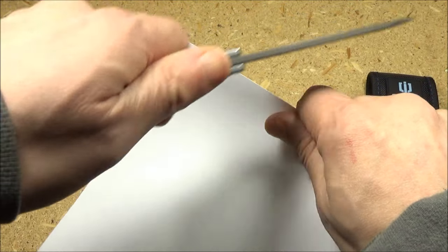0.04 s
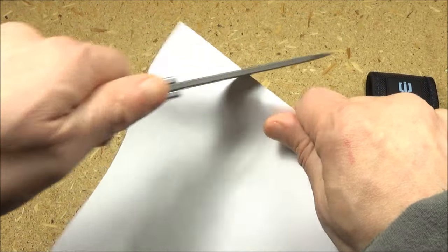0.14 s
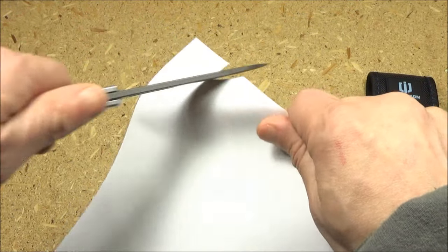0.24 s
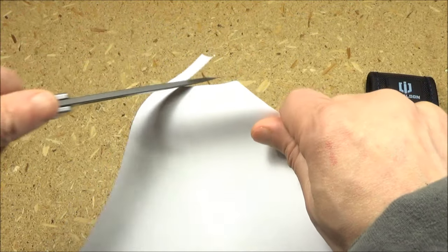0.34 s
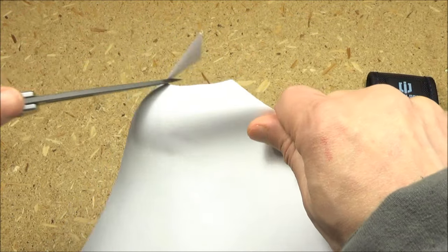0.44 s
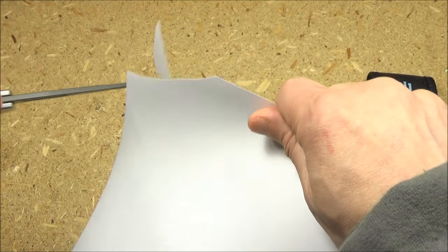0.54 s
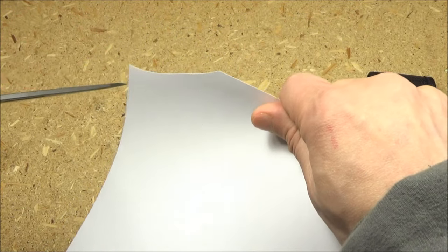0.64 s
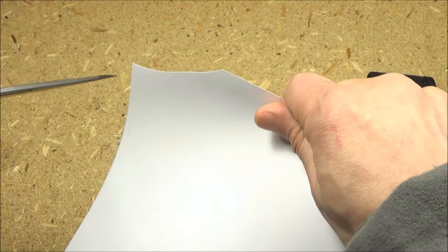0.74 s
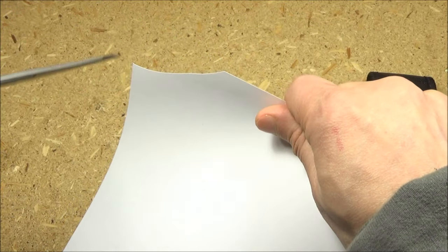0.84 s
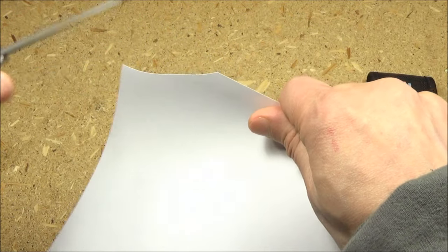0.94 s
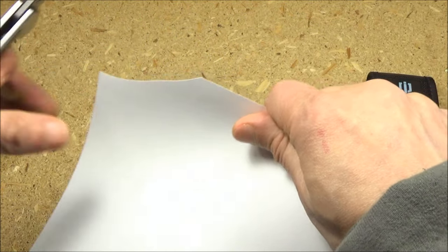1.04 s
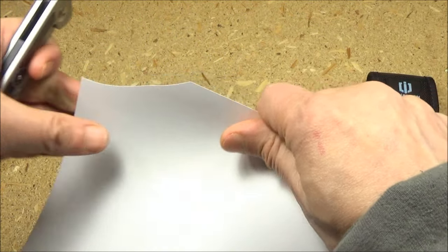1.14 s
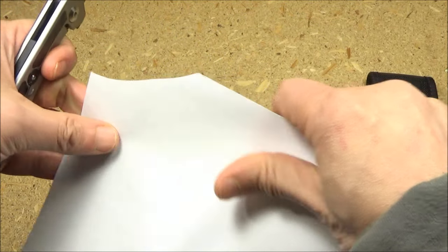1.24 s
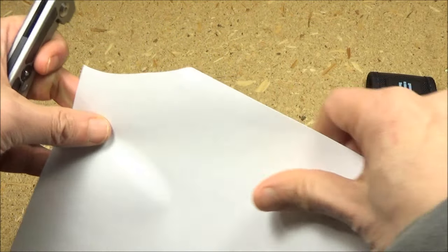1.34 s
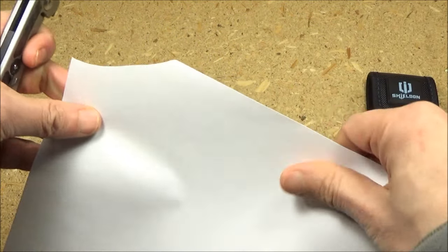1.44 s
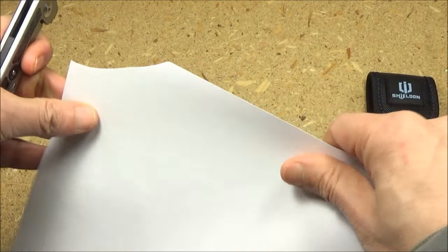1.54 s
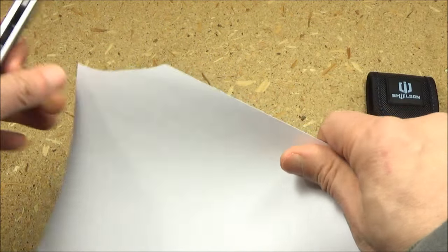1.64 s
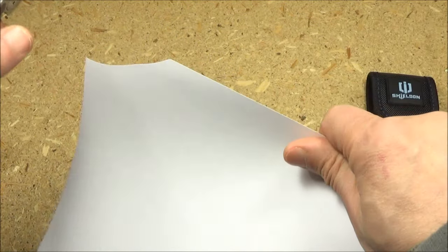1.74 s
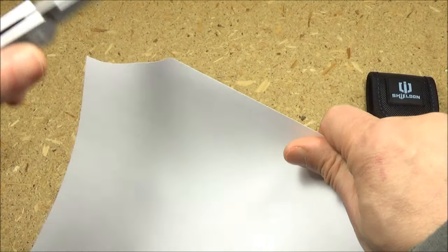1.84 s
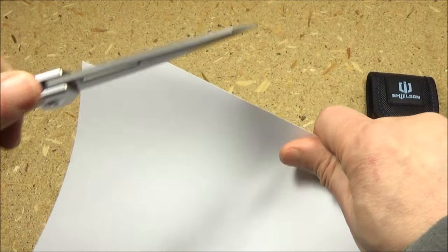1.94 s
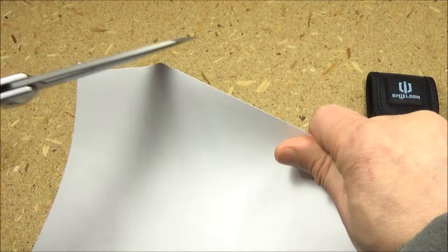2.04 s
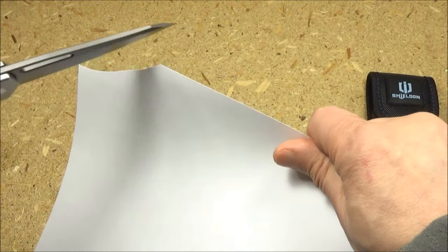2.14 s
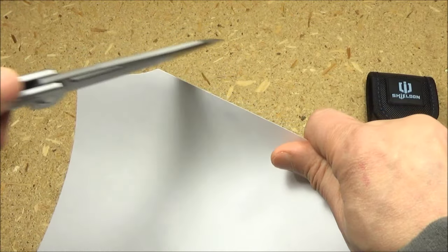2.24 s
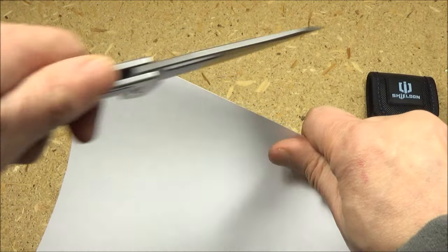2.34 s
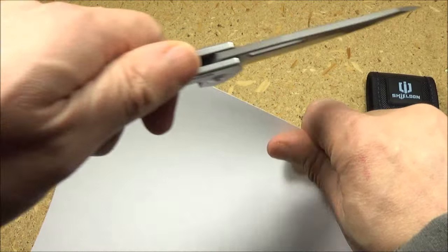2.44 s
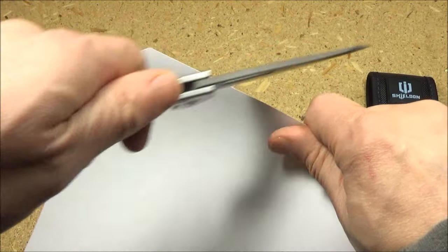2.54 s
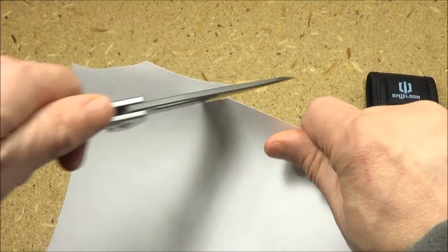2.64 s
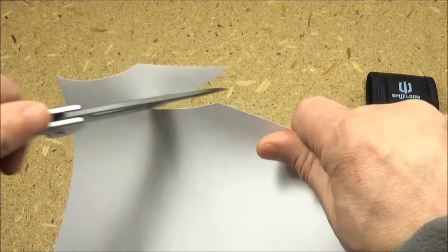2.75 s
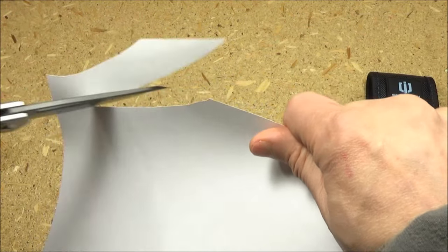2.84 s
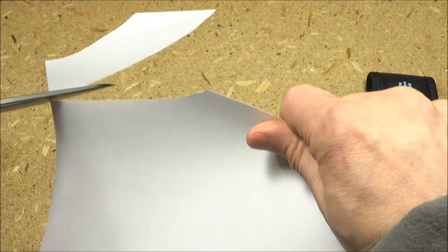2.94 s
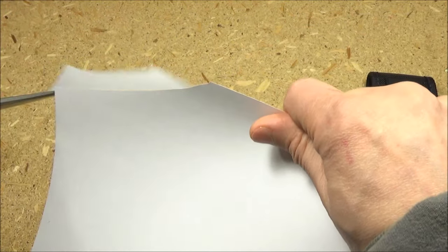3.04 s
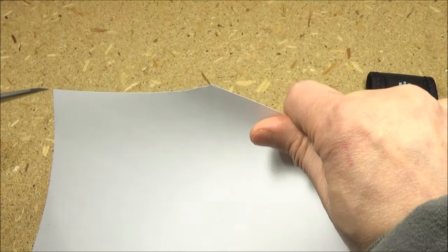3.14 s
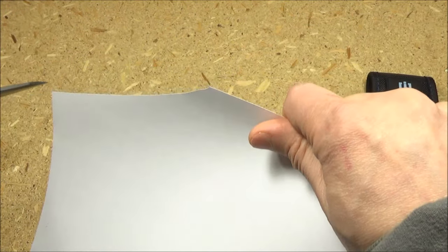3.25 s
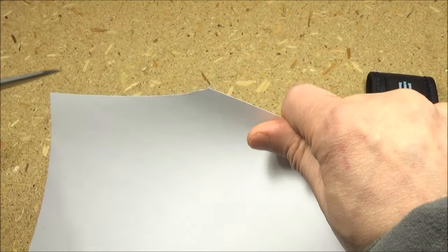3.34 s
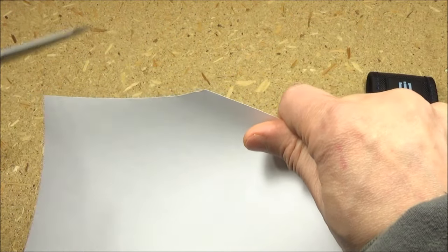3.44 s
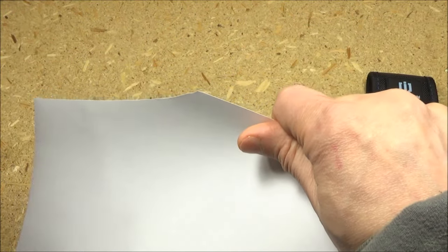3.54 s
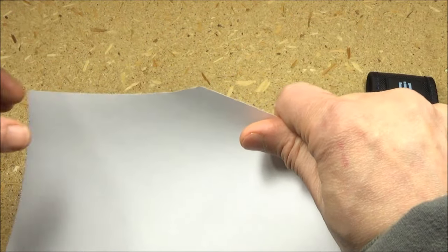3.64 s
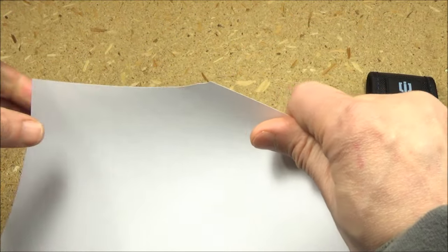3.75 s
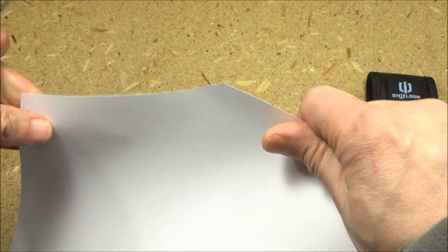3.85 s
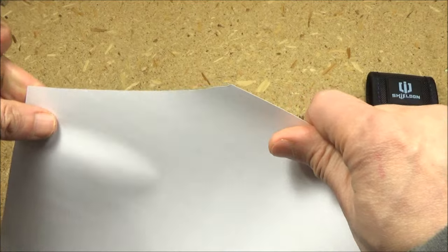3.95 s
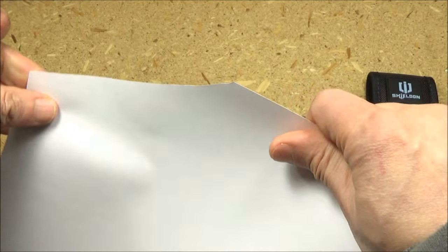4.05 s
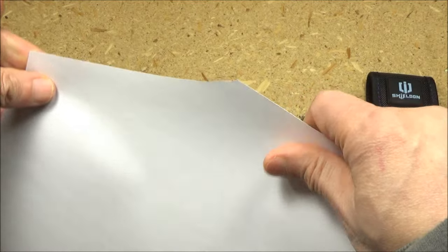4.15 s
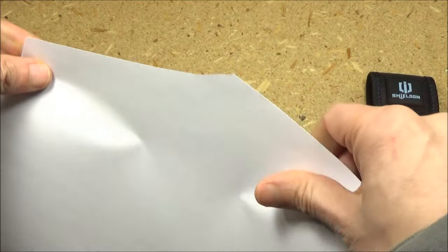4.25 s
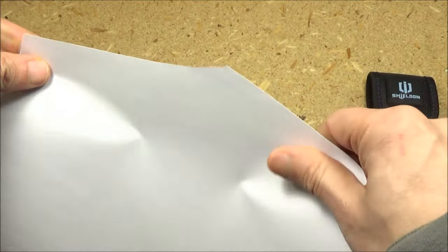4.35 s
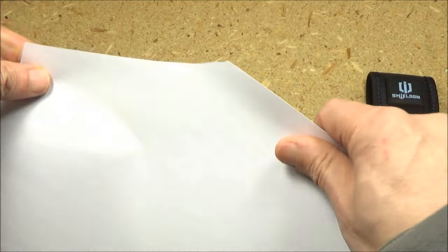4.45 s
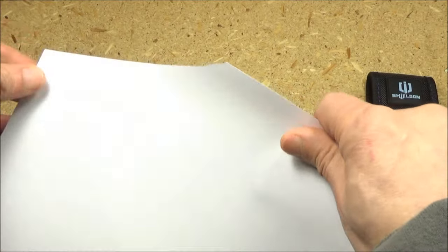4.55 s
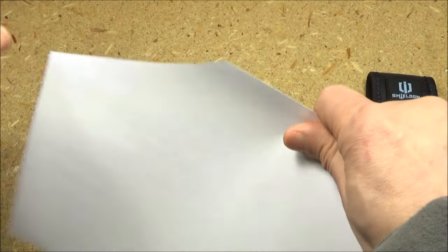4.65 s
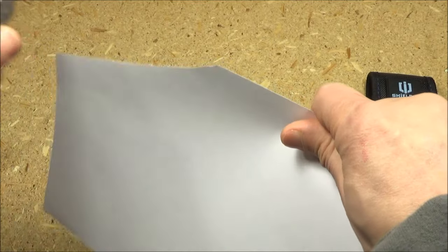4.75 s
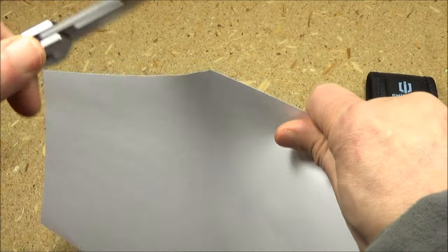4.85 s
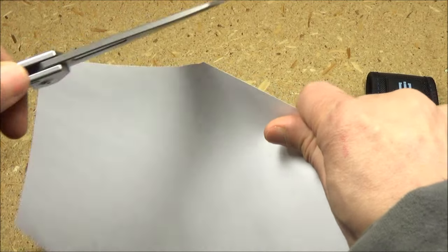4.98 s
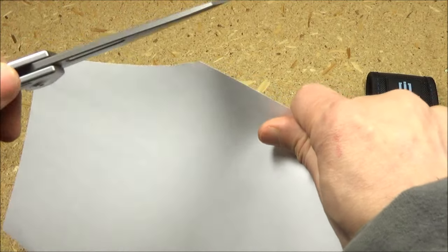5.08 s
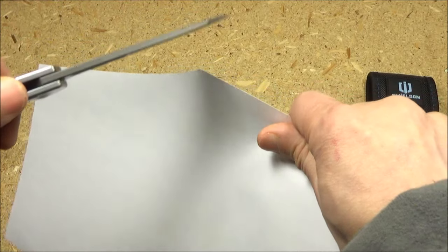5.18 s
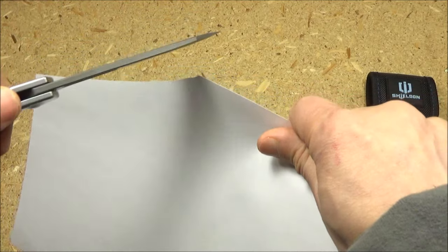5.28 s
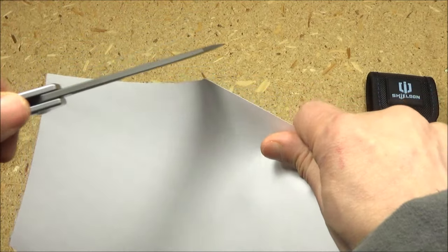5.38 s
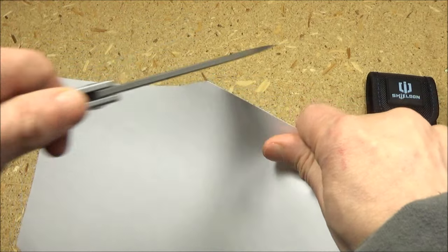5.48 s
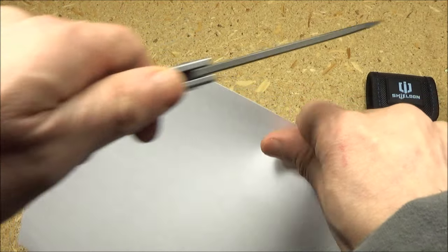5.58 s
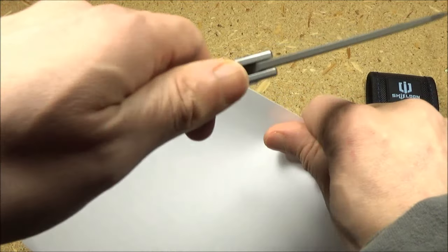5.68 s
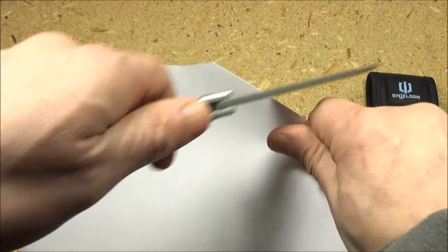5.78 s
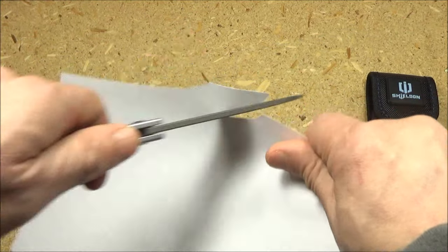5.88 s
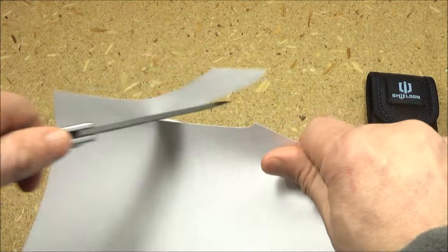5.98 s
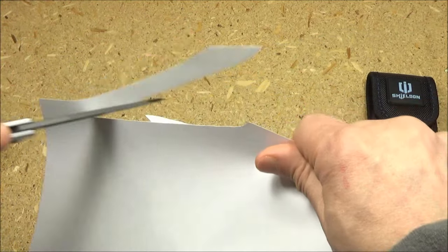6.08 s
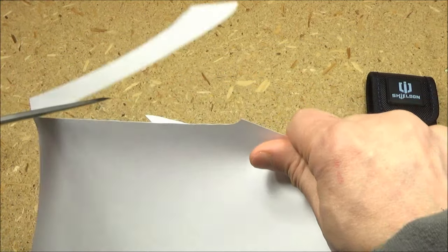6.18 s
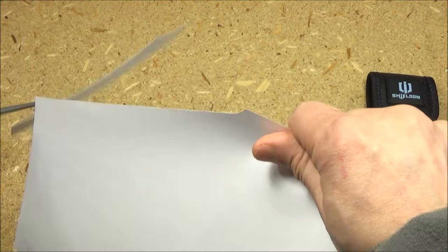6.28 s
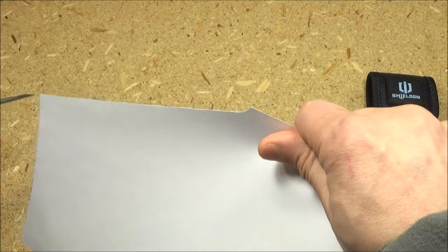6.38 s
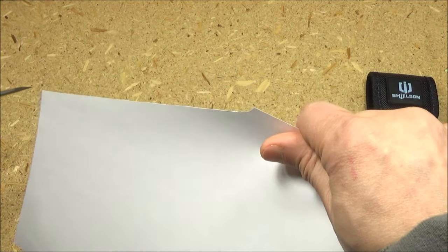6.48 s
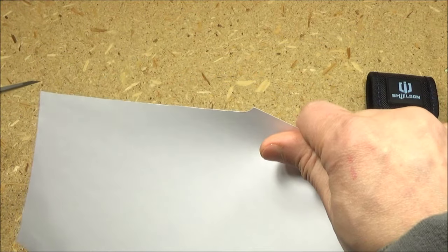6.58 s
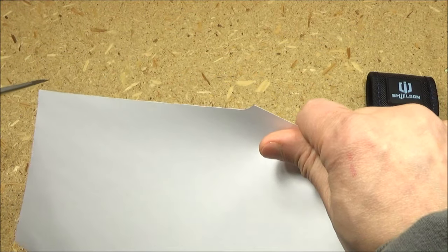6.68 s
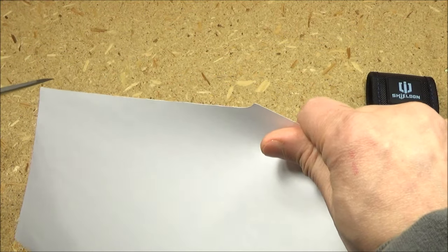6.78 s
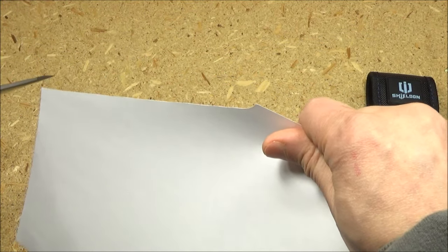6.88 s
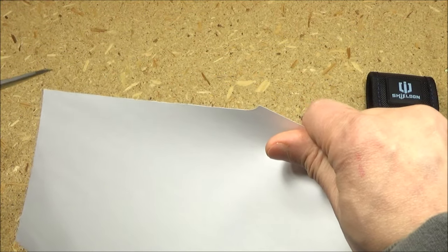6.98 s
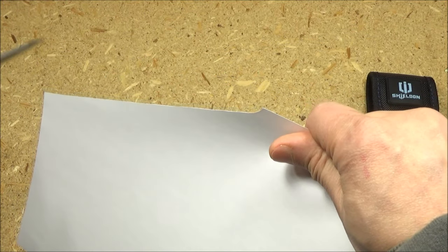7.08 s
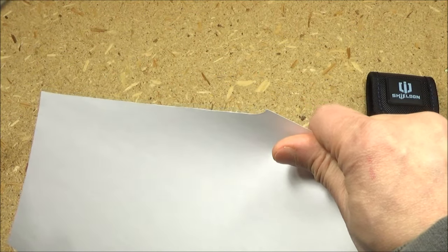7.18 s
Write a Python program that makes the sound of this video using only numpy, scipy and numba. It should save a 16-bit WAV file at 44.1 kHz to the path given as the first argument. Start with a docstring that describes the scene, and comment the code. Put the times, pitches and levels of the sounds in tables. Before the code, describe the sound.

At about 0.2 seconds a sharp knife bites into a sheet of paper with a soft thump and slices through in a bright, rasping hiss lasting under half a second, ending in a tiny rip and a papery flap. From 1.2 to 2 seconds the sheet wobbles and rustles more quietly as fingers slide over it, with a few small clicks. The blade faintly scrapes and taps the edge around 2.5 seconds, then makes a second crisp slice from 2.7 to 3.1, followed by a light tick as the sliver lands. From 3.9 to 4.9 seconds the paper flexes, crinkles and rubs, with sharp crease snaps, strongest near 4.6. After a lull, the third slice runs from 5.9 to 6.3 seconds, with a faint tap at 6.5. Everything is close and nearly mono, in a small, quiet room with a faint hum.

```python
"""A sharp knife slices three slivers off a hand-held sheet of paper above a chipboard bench.
Fibres fracture by the thousand, and these impulses excite resonances that glide as the cut advances.
The sheet wobbles, flexes, crackles and buckles, fingers and blade rub it, creases snap and slivers land.
A small, quiet room adds reverberation and a faint hum; the sound is nearly mono."""
import sys
import numpy as np
from scipy import signal
from scipy.fft import rfft, irfft, next_fast_len
from scipy.io import wavfile
from scipy.ndimage import map_coordinates
from numba import njit

SR = 44100
rng = np.random.default_rng(int(sys.argv[2]) if len(sys.argv) > 2 else 0)


def log_audio(samples):
    """Write samples as a 16-bit WAV file to the path given in sys.argv[1]."""
    # one column per channel
    frames = np.atleast_2d(samples).T
    # limit to full scale, then quantise
    limited = np.clip(frames, -1, 1)
    pcm = np.round(limited * 32767).astype(np.int16)
    wavfile.write(sys.argv[1], SR, pcm)


N = 318402
TIME = np.arange(N) / SR


def from_db(db):
    """Amplitude ratio of a level in decibels."""
    return 10 ** (np.asarray(db) / 20)


def unit_rms(x):
    """Normalisation to an rms of 1."""
    return x / np.sqrt(np.mean(x ** 2) + 1e-20)


def at_hz(points, hz):
    """Interpolation along log frequency."""
    freqs, values = np.transpose(points)
    return np.interp(np.log(np.maximum(hz, 1)), np.log(freqs), values)


def in_time(curves):
    """Interpolation along time through the joined curves, one signal a column."""
    times, *columns = np.vstack(curves).T
    return [np.interp(TIME, times, column) for column in columns]


def drift(rate_hz):
    """Random modulation: straight lines between Gaussian values; rms 1."""
    knots = rng.standard_normal(N // 10)
    return unit_rms(np.interp(TIME * rate_hz, np.arange(len(knots)), knots))


def coloured(x, spectrum):
    """Spectral shaping by a table of relative gains; rms 1."""
    size = next_fast_len(N + 4096)
    gain = from_db(at_hz(spectrum, np.fft.rfftfreq(size, 1 / SR)))
    return unit_rms(irfft(rfft(x, size) * gain, size)[:N])


def grains(per_s, spread_db, clump_db, clump_hz):
    """Shot noise: tiny slips and breaks of uneven size, louder in clumps; rms 1."""
    occurs = rng.random(N) < per_s / SR
    sizes = from_db(spread_db * np.minimum(rng.exponential(1, N), 4)) * rng.choice([-1, 1], N)
    return unit_rms(occurs * sizes * from_db(clump_db * drift(clump_hz)))


@njit
def glide_filter(x, tangent, damping):
    """State-variable band-pass with a moving centre and a peak gain of 1."""
    out, first, second = np.zeros(len(x)), 0.0, 0.0
    for i in range(len(x)):
        g = tangent[i]
        band = (g * (x[i] - second) + first) / (1 + g * (g + damping))
        first, second = 2 * band - first, second + 2 * g * band
        out[i] = damping * band
    return out


def resonate(x, hz, q):
    """Forced response of a damped resonator, steady or gliding in pitch."""
    tangent = np.tan(np.pi * np.clip(hz, 20, .45 * SR) / SR) * np.ones(len(x))
    return glide_filter(x + 1e-18, tangent, 1 / q)


def burst(hz, q, t60_s):
    """Free decay of a crowd of sheet modes around one pitch, struck at once."""
    t = TIME[:SR // 3]
    modes = resonate(resonate(rng.standard_normal(len(t)), hz, q), hz, q)
    return unit_rms(modes) * from_db(-60 * t / t60_s)


def add(track, start_s, sound):
    """Superposition of a sound on a track."""
    start = round(start_s * SR)
    track[start:start + len(sound)] += sound[:N - start]


def swells(rows, rise_db_per_s, fall_db_per_s):
    """Power sum of envelopes that rise, hold and decay; rows are start_s, hold_s, level_db."""
    power = 0
    for start_s, hold_s, level_db in rows:
        below_db = np.maximum(rise_db_per_s * (start_s - TIME), fall_db_per_s * (TIME - start_s - hold_s))
        power = power + from_db(level_db - np.clip(below_db, 0, 120)) ** 2
    return np.sqrt(power)


# spectrum of the quiet room: frequency_hz, relative_db
ROOM_SPECTRUM = [(25, -3), (43, -7), (90, -3), (170, -5), (550, -15.5), (980, -16.5), (1400, -23),
                 (16000, -30.5)]
# hum and whine: pitch_hz, level_db
HUM_TONES = [(91.5, -75), (1028, -75.5), (7407, -86)]

def room_tone():
    """Ambient noise: narrow bands, heard as hum and whine, over a broadband floor."""
    hum = sum(from_db(db) * unit_rms(resonate(rng.standard_normal(N), hz, q=66)) for hz, db in HUM_TONES)
    return from_db(-62.5) * coloured(rng.standard_normal(N), ROOM_SPECTRUM) + hum


# bends of the sheet: start_s, hold_s, wobble_db, flex_db
BENDS = [(0.0, 0.22, -52.5, -55), (0.149, 0.055, -47.5, -46), (0.481, 0.19, -44.5, -39),
         (1.17, 0.22, -59.5, -51.5), (1.33, 0.064, -46, -43.5), (1.528, 0.2, -53, -47),
         (1.707, 0.016, -39, -41.5), (1.777, 0.14, -46.5, -41), (2.143, 0.2, -60.5, -58.5),
         (2.465, 0.19, -52.5, -47.5), (3.565, 0.12, -67.5, -60), (3.717, 0.009, -55.5, -53.5),
         (3.959, 0.034, -40.5, -37), (4.222, 0.13, -45.5, -45.5), (4.461, 0.085, -44.5, -37.5),
         (4.542, 0.037, -39, -37), (4.693, 0.047, -43, -47), (4.81, 0.088, -46.5, -45.5),
         (4.943, 0.31, -64, -62.5), (5.58, 0.45, -61.5, -62), (6.09, 0.27, -48, -50.5),
         (6.398, 0.032, -59.5, -85)]
# spectra of the low wobble and the crinkle of flexing: frequency_hz, relative_db
WOBBLE_SPECTRUM = [(50, -32), (100, -8), (210, -4.5), (320, 0.5), (550, -10), (900, -9), (2000, -58.5)]
FLEX_SPECTRUM = [(300, -15.5), (800, -4), (1350, 3.5), (2000, -3), (3000, -6), (5000, -7), (12000, -41.5)]

def bending():
    """Flexural vibration: the sheet wobbles and crinkles. Returns the sound and the flexing envelope."""
    slopes = dict(rise_db_per_s=400, fall_db_per_s=224)
    cut_wobble_db, held_flex_db, held_still_from_s = -50, -71.5, 5.9
    by_hand = [(start_s, hold_s, db) for start_s, hold_s, db, _ in BENDS]
    by_blade = [(start_s, end_s - start_s, cut_wobble_db) for start_s, end_s, *_ in CUTS]
    wobble_gain = swells(by_hand + by_blade, **slopes)
    flex_gain = swells([(start_s, hold_s, db) for start_s, hold_s, _, db in BENDS], **slopes)
    # the held sheet stirs faintly between bends
    flex_gain = np.hypot(flex_gain, (TIME < held_still_from_s) * from_db(held_flex_db))
    wobble = coloured(grains(per_s=1100, spread_db=4, clump_db=2.5, clump_hz=40), WOBBLE_SPECTRUM)
    crinkle = coloured(grains(per_s=3500, spread_db=1, clump_db=3, clump_hz=97), FLEX_SPECTRUM)
    return wobble_gain * wobble + flex_gain * crinkle, flex_gain


# fingers or blade slide over the sheet: start_s, hold_s, level_db
SLIDES = [(0.61, 0.021, -42.5), (1.25, 0.085, -46), (1.338, 0.14, -36), (1.54, 0.039, -32.5),
          (1.675, 0.14, -38), (1.85, 0.046, -44.5), (4.05, 0.092, -53), (4.165, 0.079, -41.5),
          (4.32, 0.058, -42.5), (4.443, 0.058, -35), (4.55, 0.011, -28.5), (4.625, 0.019, -38.5)]
# spectrum of the friction: frequency_hz, relative_db
FRICTION_SPECTRUM = [(1500, -3), (3200, -7), (4600, 3), (11000, 1.5), (13500, -0.5), (16000, -12)]
FRICTION_SLOPES = dict(rise_db_per_s=478.5, fall_db_per_s=376)

def sliding(flex_gain):
    """Friction noise: skin and steel slip over the grain, and the patch of paper beneath resonates."""
    grip_gain = np.minimum(from_db(-2) * flex_gain, from_db(-51.5))  # skin rubs on a bending sheet
    gain = np.hypot(swells(SLIDES, **FRICTION_SLOPES), grip_gain)
    rub = coloured(grains(per_s=16000, spread_db=3, clump_db=1.8, clump_hz=94), FRICTION_SPECTRUM)
    patch_hz = 9500 * np.exp(0.034 * drift(18))  # wanders as the finger moves
    return gain * unit_rms(rub + from_db(-2) * resonate(rub, patch_hz, q=14))


# spectrum of catching or breaking fibres: frequency_hz, relative_db
FIBRE_SPECTRUM = [(300, -23), (750, -3), (1150, 6), (3200, -0.5), (6400, 1), (8500, -2), (12000, -5),
                  (14000, -5), (16000, -18)]

def crackling(flex_gain):
    """Acoustic emission: single fibres catch as the sheet flexes."""
    catches = grains(per_s=45, spread_db=5.5, clump_db=1, clump_hz=8.4)
    return from_db(-10.5) * flex_gain * coloured(catches, FIBRE_SPECTRUM)


# the sheet gives way under blade or finger: start_s, thump_db, flap_db, t60_s
BUCKLES = [(0.2405, -28, -35.5, 0.035), (0.657, -47, -28, 0.15), (1.318, -32, -41.5, 0.14),
           (1.41, -29.5, -37, 0.026), (2.7119, -21.5, -33, 0.024), (3.976, -48.5, -28.5, 0.11),
           (4.228, -34.5, -42, 0.26), (4.583, -27, -28.5, 0.073), (4.8177, -37.5, -38, 0.15),
           (5.9305, -23.5, -26, 0.045)]

def buckling():
    """Elastic instability: a soft thump, and a papery flap whose pitch falls as tension relaxes."""
    slack_hz, tension_hz, slacken_s = 1200, 1800, 0.01
    flap_hz = slack_hz + tension_hz * np.exp(-TIME[:SR // 3] / slacken_s)
    out = np.zeros(N)
    for start_s, thump_db, flap_db, t60_s in BUCKLES:
        thump = from_db(thump_db) * burst(hz=276, q=0.71, t60_s=t60_s)
        flap = from_db(flap_db) * burst(flap_hz, q=0.82, t60_s=t60_s)
        add(out, start_s, thump + flap)
    return out


def fibre_breaks():
    """Fracture: each fibre the blade snaps gives one impulse."""
    return grains(per_s=5500, spread_db=3.2, clump_db=1.6, clump_hz=300)


def ringing(hz, gain_db, q):
    """Forced resonance of paper driven by breaking fibres."""
    centre_hz = hz * np.exp(0.027 * drift(30))  # the sliver flutters as it curls
    return from_db(gain_db) * resonate(resonate(fibre_breaks(), centre_hz, q), centre_hz, q)


def sliver_echo(x, edge_hz):
    """Comb filtering: each break runs along the sliver and back, carving moving ridges in the spectrum."""
    round_trip_s = 2 / edge_hz * np.exp(0.012 * drift(25))
    echo = map_coordinates(x, [(TIME - round_trip_s) * SR], order=3)
    reflection = 0.33
    return (x + reflection * echo) / np.hypot(1, reflection)


def blade_drag():
    """Amplitude modulation by thick and thin spots, and by deepening stick-slip as the first cut ends."""
    thickness_gain = from_db(1.1 * drift(120))
    chatter_span_s, chatter_hz, chatter_db = [0.54, 0.616], 95, 5.5
    depth_db = np.interp(TIME, chatter_span_s, [0, chatter_db], right=0)
    slips = np.sin(2 * np.pi * chatter_hz * TIME + 1.6 * drift(60))
    return thickness_gain * from_db(depth_db * (slips - 1.57))


# strokes of the knife: start_s, end_s, tear_db, sizzle_hz, sizzle_gain_db
CUTS = [(0.241, 0.616, -27.5, 14100, -22), (2.711, 3.073, -28.5, 12500, -21),
        (5.932, 6.339, -28, 13800, -21.5)]
# loose flap beside the blade, quieter while taut, one curve a cut: time_s, pitch_hz, gain_db
FLAP_CURVES = [
    [(0.26, 1392, -16), (0.39, 1037, -19.5), (0.447, 1072, -20), (0.475, 1290, -23.5), (0.555, 1390, -10),
     (0.616, 1450, -10)],
    [(2.713, 1340, -17), (2.86, 1306, -23), (2.96, 1790, -18), (3.074, 2810, -17)],
    [(5.932, 1637, -14.5), (6.09, 1400, -40.5), (6.145, 1960, -17), (6.29, 1610, -16.5)],
]
# cut edge as the blade changes angle, one curve a cut: time_s, pitch_hz, zip_gain_db, rasp_gain_db
EDGE_CURVES = [
    [(0.241, 5130, -24, -23.5), (0.29, 5640, -18.5, -20.5), (0.385, 5200, -12, -16),
     (0.44, 2950, -15.5, -17.5), (0.475, 4010, -11, -14), (0.53, 5240, -14, -21.5),
     (0.613, 4880, -15, -28.5)],
    [(2.713, 4665, -15.5, -20.5), (2.81, 5100, -12, -18.5), (2.91, 5720, -15, -15),
     (2.95, 5820, -21.5, -16), (3.06, 6040, -24.5, -16)],
    [(5.931, 3930, -20.5, -19.5), (5.99, 4626, -22.5, -19.5), (6.08, 5340, -10.5, -20.5),
     (6.15, 5530, -25.5, -16.5), (6.22, 4455, -23.5, -20), (6.341, 4040, -17.5, -26)],
]
# hiss of the curling sliver, one curve a cut: time_s, pitch_hz, gain_db
HISS_CURVES = [
    [(0.241, 11510, -20), (0.35, 8800, -21), (0.43, 8480, -18), (0.49, 8370, -28), (0.555, 8880, -16),
     (0.613, 8630, -12.5)],
    [(2.713, 8920, -16.5), (2.785, 9430, -18), (2.85, 9060, -23), (2.915, 9380, -16.5), (2.96, 7840, -23.5),
     (3.076, 8280, -20)],
    [(5.945, 7800, -17.5), (5.972, 10630, -16), (5.99, 11460, -14), (6.025, 8940, -14), (6.12, 8830, -21),
     (6.17, 10400, -27), (6.24, 9440, -19.5), (6.341, 8900, -20.5)],
]

def slicing():
    """Source and filter: breaking fibres radiate directly and drive flap, edge and sliver resonances."""
    cuts = np.array(CUTS)
    latest_cut = np.maximum(np.searchsorted(cuts[:, 0], TIME, "right") - 1, 0)
    start_s, end_s, tear_db, sizzle_hz, sizzle_db = cuts[latest_cut].T
    cutting = (TIME >= start_s) & (TIME < end_s)
    age_s = np.clip(TIME, start_s, end_s) - start_s
    progress = age_s / (end_s - start_s)
    flap_hz, flap_db = in_time(FLAP_CURVES)
    edge_hz, zip_db, rasp_db = in_time(EDGE_CURVES)
    hiss_hz, hiss_db = in_time(HISS_CURVES)
    # the blade bites hard into the rim, then tears more as it runs faster
    bite_db, bite_s, growth_db = 12.5, 0.021, 8.5
    tear_db = tear_db + bite_db * np.exp(-age_s / bite_s) + growth_db * (progress - .5)
    # the finest fibres sizzle only while the new sliver is short and stiff
    sizzle_s, fade_db_per_s = 0.094, 179
    sizzle_db = sizzle_db - fade_db_per_s * np.maximum(age_s - sizzle_s, 0)

    tearing = coloured(fibre_breaks(), FIBRE_SPECTRUM)
    bass_cut = signal.butter(4, 930, "high", fs=SR, output="sos")  # a short sliver radiates little bass
    flap = signal.sosfilt(bass_cut, ringing(flap_hz, flap_db, q=1.7))
    edge = ringing(hz=4350, gain_db=rasp_db, q=2.3) + ringing(edge_hz, zip_db, q=7)
    hiss = ringing(hiss_hz, hiss_db + 2, q=1.97)
    sizzle = ringing(sizzle_hz, sizzle_db, q=2.2)
    sliver = sliver_echo(hiss + sizzle + from_db(tear_db) * tearing, edge_hz)
    # the last corner of the first sliver rips off
    rip_at_s, rip_length_s, rip_db = 0.647, 0.0068, -20
    ripping = (TIME >= rip_at_s) & (TIME < rip_at_s + rip_length_s)
    return cutting * blade_drag() * (flap + edge + sliver) + ripping * from_db(rip_db) * tearing


# slivers land, fingers and blade tap the paper's edge: start_s, level_db, pitch_hz, t60_s
TAPS = [(0.8134, -41, 9300, 0.031), (1.264, -32.5, 7450, 0.011), (2.5225, -39, 5000, 0.049),
        (3.2963, -36, 2960, 0.075), (3.909, -46, 4180, 0.2), (4.123, -44, 2484, 0.39),
        (6.535, -45.5, 3290, 0.099)]

def tapping():
    """Impact excitation: light, dry contacts set a broad band of paper modes ringing."""
    out = np.zeros(N)
    for start_s, level_db, pitch_hz, t60_s in TAPS:
        add(out, start_s, from_db(level_db) * burst(pitch_hz, q=0.28, t60_s=t60_s))
    return out


# creases snap: start_s, peak_db, pitch_hz
CREASE_SNAPS = [(1.3145, -26, 3390), (1.3277, -19.5, 3010), (3.9602, -10.5, 4680), (3.9716, -16, 4350),
                (4.5116, -18.5, 2370), (4.527, -19, 2860), (4.5416, -18.5, 4540), (4.5592, -5.5, 3190),
                (4.563, -22.5, 2855), (4.567, -15.5, 2750), (4.818, -13.5, 4284)]

def snapping():
    """Snap-through: a crease flips over with a sharp crack of a few milliseconds."""
    out = np.zeros(N)
    for start_s, peak_db, pitch_hz in CREASE_SNAPS:
        crack = burst(pitch_hz, q=1.2, t60_s=0.0028)
        add(out, start_s, from_db(peak_db) * crack / np.abs(crack).max())
    return out


# the blade scrapes lightly along the rim: start_s, hold_s, level_db
SCRAPES = [(2.45, 0.24, -55.5), (3.24, 0.12, -63.5)]
# modes of the rim: pitch_hz, relative_db
RIM_MODES = [(2700, 3.5), (4600, 0.5), (9600, -10.5)]

def scraping():
    """Frictional excitation: the rim rings faintly as the blade seeks its place."""
    slips = grains(per_s=3400, spread_db=3, clump_db=-0.5, clump_hz=83)
    rim = unit_rms(sum(from_db(db) * resonate(slips, hz, q=9) for hz, db in RIM_MODES))
    return swells(SCRAPES, **FRICTION_SLOPES) * rim


# reverberation time of the room: frequency_hz, t60_s
ROOM_DECAY = [(200, 0.79), (1000, 0.29), (9000, 0.21), (15000, 0.092)]

def reverb(x):
    """Diffuse field: reflections build up within milliseconds and die sooner in the treble."""
    t, edges_hz, response = TIME[:SR * 2 // 3], np.geomspace(80, 17000, 9), 0
    for low, high in zip(edges_hz, edges_hz[1:]):
        band_pass = signal.butter(2, [low, high], "band", fs=SR, output="sos")
        band = signal.sosfilt(band_pass, rng.standard_normal(len(t)))
        response = response + band * from_db(-60 * t / at_hz(ROOM_DECAY, np.sqrt(low * high)))
    response = response * (1 - np.exp(-t / 0.00036))
    return signal.fftconvolve(x, response / np.sqrt(np.sum(response ** 2)))[:N]


# side signal of closely spaced microphones: frequency_hz, relative_db
SIDE_SPECTRUM = [(600, 20.5), (3200, -53.5), (4800, 21), (9000, 25), (11500, -7.5)]

def stereo(mid):
    """Phase difference: a faint side signal in quadrature widens the sound at equal channel levels."""
    quadrature = signal.hilbert(mid).imag
    side = from_db(-29) * np.std(mid) * coloured(quadrature, SIDE_SPECTRUM)
    return np.array([mid + side, mid - side])


def scene():
    """Superposition of the close paper's direct sound, its reverberation and the ambient noise."""
    knife = slicing() + scraping()
    bends, flex_gain = bending()
    handling = bends + sliding(flex_gain) + crackling(flex_gain)
    paper = knife + handling + snapping() + tapping() + buckling()
    return stereo(paper + room_tone() + from_db(-13.5) * reverb(paper))


def record(dry):
    """Soft saturation rounds the highest peaks, and a steep low-pass cuts the top."""
    ceiling, cutoff_hz = 0.38, 16100
    low_pass = signal.ellip(12, .1, 80, cutoff_hz, fs=SR, output="sos")
    return signal.sosfilt(low_pass, ceiling * np.tanh(dry / ceiling))


dry = scene()
out = record(dry)
log_audio(out)
```